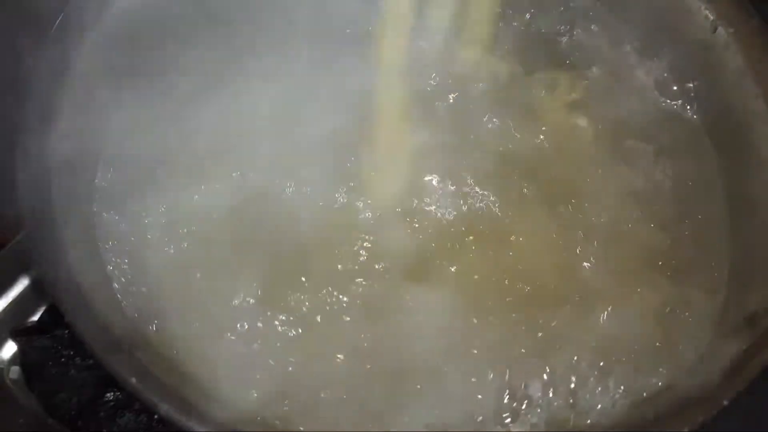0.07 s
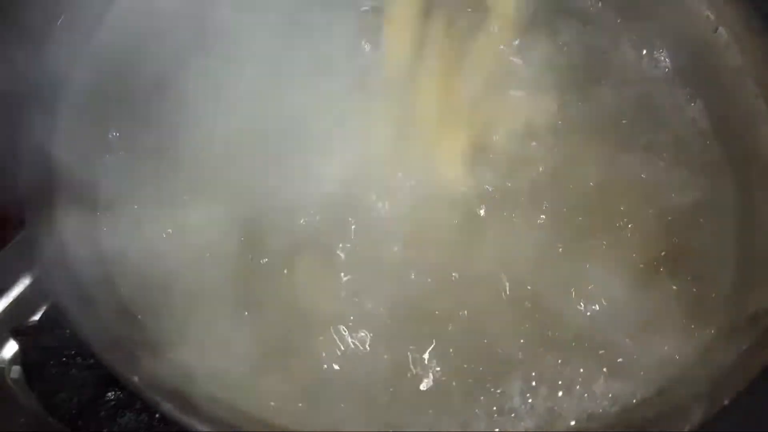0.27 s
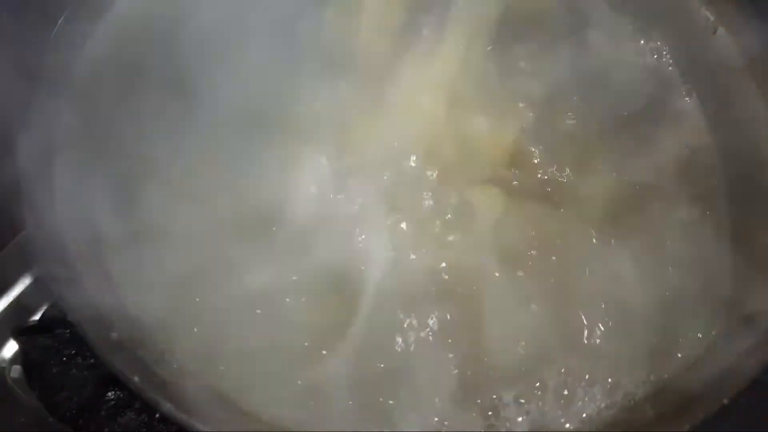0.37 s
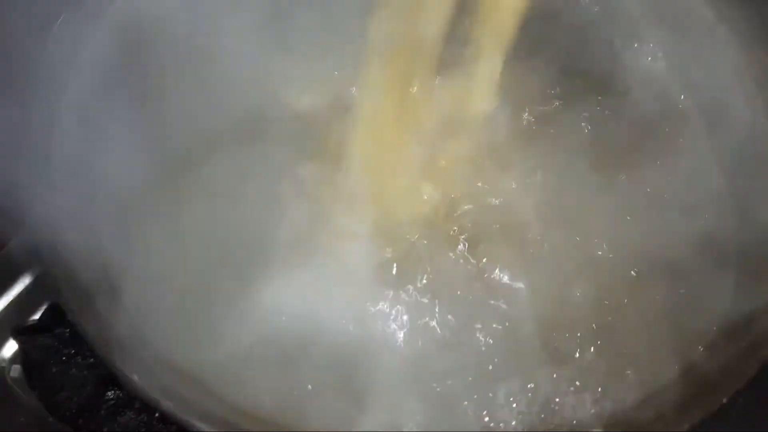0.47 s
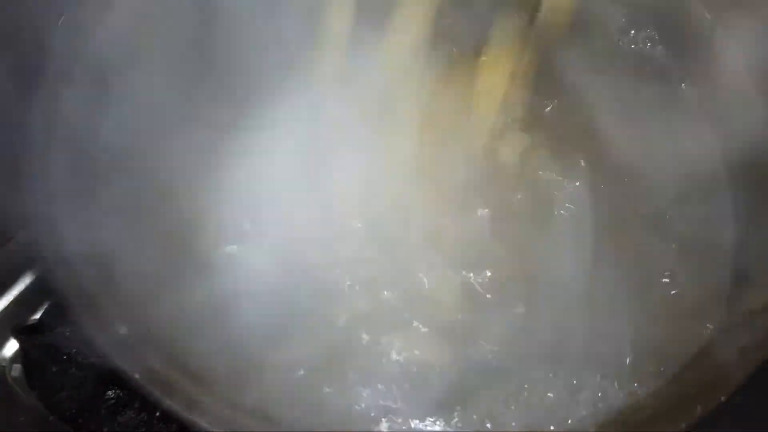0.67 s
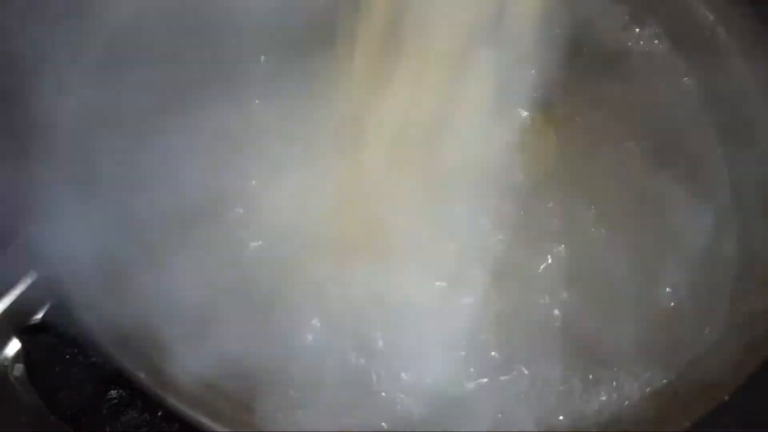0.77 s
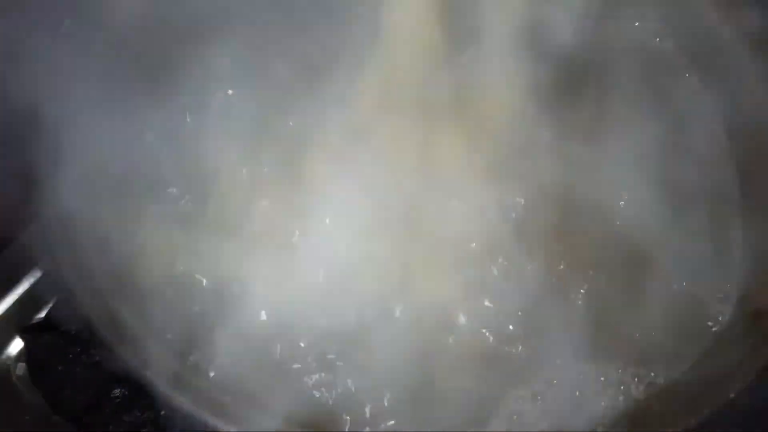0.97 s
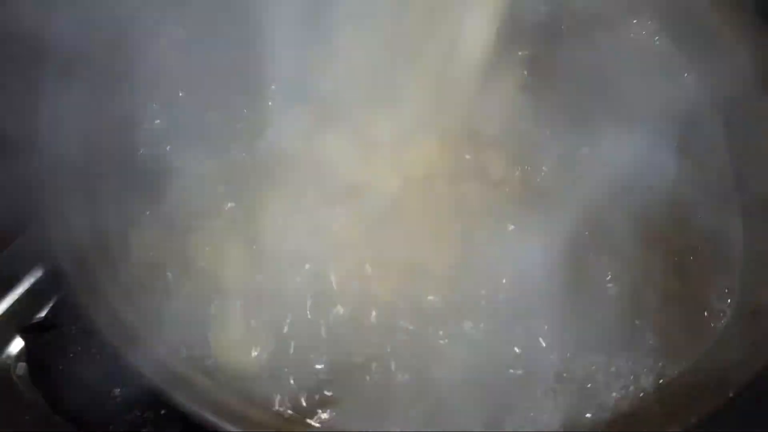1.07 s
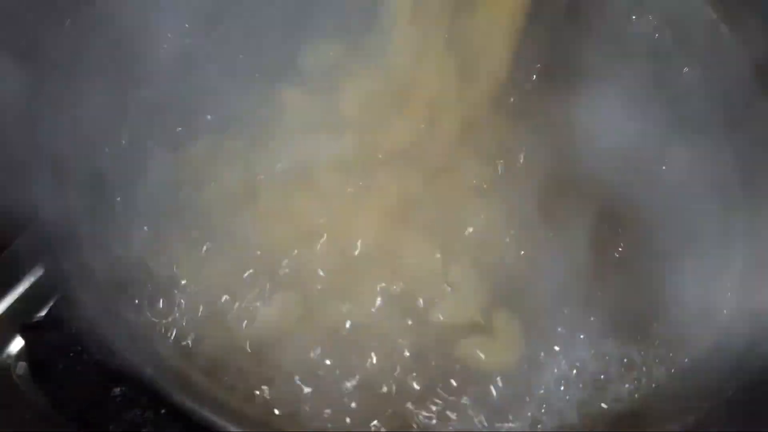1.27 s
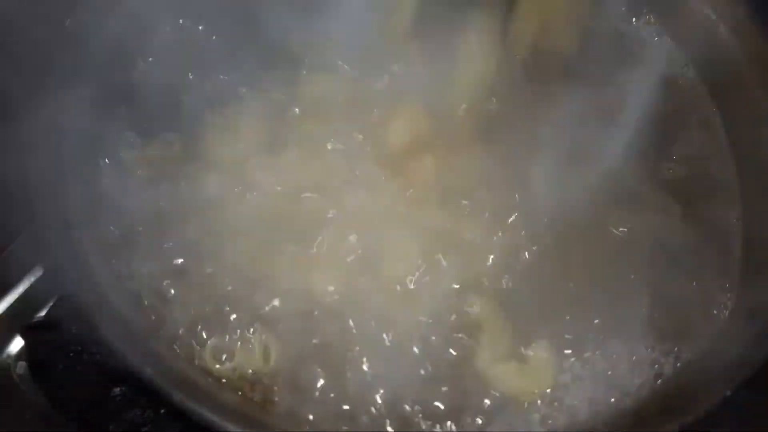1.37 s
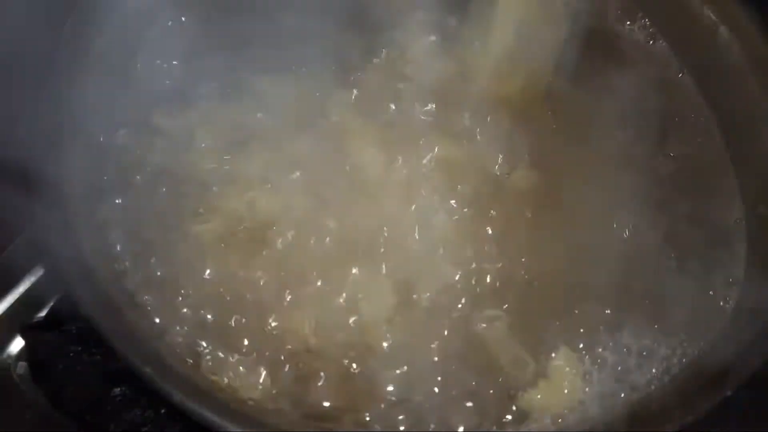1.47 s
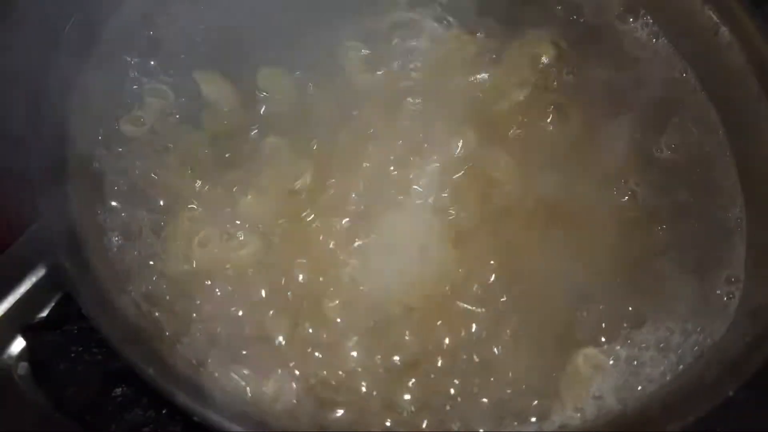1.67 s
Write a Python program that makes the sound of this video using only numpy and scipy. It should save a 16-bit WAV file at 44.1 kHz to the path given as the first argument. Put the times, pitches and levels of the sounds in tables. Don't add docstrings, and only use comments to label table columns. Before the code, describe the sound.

Dry pasta pours into boiling water, heard close in a small kitchen. Quiet simmer and faint ticks open; from 0.2 seconds hollow, bright clacks gather with small plops. The rattle thickens from 0.6, loudest around 0.8 to 1.3 in two merging rushes, with bubbling splashes, hissing spray and slight pan ring. It drops sharply after 1.4, leaving sparse faint clicks, one small crack near 1.6 and soft simmer.

```python
import sys
import numpy as np
from scipy import signal
from scipy.fft import rfft, irfft, next_fast_len
from scipy.io import wavfile
from scipy.ndimage import uniform_filter1d, map_coordinates

SR = 44100
rng = np.random.default_rng(int(sys.argv[2]) if len(sys.argv) > 2 else 0)


def boost(x):
    u = np.asarray(x, float) / 20
    return 10 ** u


def log_audio(samples):
    frames = np.atleast_2d(samples).T
    limited = np.clip(frames, -1, 1)
    pcm = np.round(limited * 32767).astype(np.int16)
    wavfile.write(sys.argv[1], SR, pcm)


N = 74970

# time_s, rattle_db, chips_over_rattle_db, spray_over_rattle_db
POUR = [(0, -61.5, 9, -11), (.19, -57.5, 3.5, -16), (.23, -52.5, 2.5, -17), (.3, -49.5, -4, -17),
        (.45, -47, 2, -31), (.48, -46.5, -8, -12), (.6, -37, 0, -14), (.655, -46, 2.5, -27),
        (.7, -36, -1, -13.5), (.78, -39, -10, -14.5), (1.01, -32, -19, -13), (1.05, -38, -16, -7.5),
        (1.2, -37, -20, -10.5), (1.237, -41.5, -16, -9), (1.33, -36.5, -6, -11), (1.44, -49, -3, -21),
        (1.53, -68.5, 11.5, -17), (1.7, -77, 15, -20)]
# time_s, level_db
SPLASHING = [(0, -67.5), (.09, -59), (.17, -65), (.26, -57.5), (.33, -47), (.425, -43.5), (.46, -44),
             (.58, -37), (.655, -40), (.69, -38.5), (.95, -39.5), (1.012, -33.5), (1.04, -38),
             (1.28, -36.5), (1.42, -50.5), (1.495, -54), (1.525, -65), (1.7, -65)]
# start_s, peak_db, pitch_hz
TUBE_KNOCKS = [(0.2043, -35, 3900), (0.2123, -28, 3730), (0.2151, -41, 3720), (0.2509, -38, 3920),
               (0.2632, -34, 3830), (0.2667, -37, 3550), (0.2976, -37, 3690), (0.3081, -41, 3570),
               (0.3248, -28, 3770), (0.3318, -33, 3420), (0.3377, -29, 3650), (0.3481, -30.5, 3970),
               (0.3782, -31, 3580), (0.3943, -37, 3640), (0.4169, -32, 3860), (0.4223, -28, 3840),
               (0.4264, -31, 3600), (0.4305, -37, 3680), (0.4705, -28.5, 3520), (0.4751, -32, 3640),
               (0.4888, -31, 3870), (0.4948, -23.5, 3580), (0.4993, -33, 3450), (0.5026, -27, 3700),
               (0.5105, -32, 3500), (0.5136, -28, 3420), (0.517, -30, 3440), (0.5589, -24.5, 3930),
               (0.5883, -29, 3510), (0.6081, -27, 3420), (0.6125, -23, 3740), (0.6308, -35, 3960),
               (0.6498, -28.5, 3680), (0.6675, -30, 3690), (0.671, -27, 3980), (0.6881, -23, 3670),
               (0.7052, -23, 3650), (0.7333, -29, 3640), (0.7404, -33, 3600), (0.7639, -25, 3560),
               (0.7762, -28, 3580), (0.7854, -23.5, 3600), (0.7977, -19.5, 3700), (0.8155, -21, 3460),
               (0.8408, -18, 3750), (0.8453, -23, 3890), (0.8778, -20, 3250), (0.8822, -31, 3460),
               (0.9078, -20.5, 3630),
               (0.9466, -24, 3600), (0.9667, -23, 4050), (0.976, -18, 3540), (0.9818, -21, 3580),
                 (1.0001, -21, 3420), (1.0075, -25, 3750), (1.0215, -20, 3800), (1.0686, -19, 3770),
                 (1.0775, -18, 3720), (1.1037, -24, 3740), (1.1102, -22.5, 3630), (1.1148, -21.5, 3240),
                 (1.131, -23, 3540), (1.1535, -23.5, 3400), (1.1629, -27, 3470), (1.181, -23.5, 3480),
                 (1.19, -20, 3360), (1.193, -24, 3050), (1.1953, -19.5, 3670), (1.21, -23, 3500),
                 (1.2171, -24.5, 3670), (1.2207, -22, 3400), (1.2481, -22, 3540), (1.2544, -20.5, 3400),
                 (1.2582, -20, 3400), (1.262, -19.5, 3710), (1.2664, -19, 3470), (1.292, -23.5, 3970),
                 (1.3069, -21.5, 3730), (1.3285, -20.5, 3430), (1.3313, -25, 3550), (1.339, -24, 4080),
                 (1.3655, -27, 3140), (1.392, -25, 3740), (1.3977, -26, 3710), (1.4036, -29, 3520),
                 (1.4084, -32, 3750), (1.411, -30, 3800), (1.4637, -38, 3690), (1.4691, -36.5, 3780),
                 (1.4802, -35.5, 3560), (1.4912, -38, 3370), (1.5402, -49, 3900), (1.5627, -45, 3710),
                 (1.577, -42.5, 3700), (1.5884, -44, 3410), (1.5923, -41, 3830), (1.6079, -37.5, 3730),
                 (1.6131, -41, 3900), (1.624, -33, 3720), (1.6772, -46, 3870)]
KNOCKS = TUBE_KNOCKS
# start_s, peak_db, pitch_hz
BRITTLE_TICKS = [(0.2369, -48, 7400), (0.393, -38, 7020), (0.4698, -37, 8200), (0.3784, -31, 2460),
                 (.5555, -29, 7400), (0.762, -41, 7700), (1.007, -21, 7340), (1.2477, -25, 7300),
                 (1.2929, -35, 8300), (1.329, -28, 8200), (1.338, -25, 7400), (1.3646, -28, 7500),
                 (1.42, -37, 8000), (1.4292, -32, 7930), (1.488, -46, 6700), (1.4527, -38, 3400),
                 (1.6938, -38, 3630)]
# start_s, level_db, dull_above_hz
CRACKS = [
    (.2635, -33, 4500),
    (.3782, -28, 3200),
    (.4705, -32, 10000),
    (1.6235, -33, 9000),
]
# pitch_hz, pitch_scatter_ln, level_db, life_cycles
TUBE_MODES = [
    (3700, .12, 0, 7.5),
    (5600, .06, -12, 8),
    (7500, .05, -18, 12),
    (4400, .07, -8, 7),
    (2400, .13, -14, 6),
]
# start_s, peak_db, pitch_hz
BIG_PLOPS = [(0.251, -43.5, 1296), (0.262, -45.5, 580), (0.312, -42, 1000), (0.337, -35.5, 1000),
             (0.378, -31, 1270), (0.422, -30, 1250), (0.486, -35.5, 965), (0.628, -28, 1110),
             (0.679, -25.5, 1104), (0.728, -29, 1100), (0.868, -30, 1290), (0.89, -25.5, 1270),
             (0.991, -26, 1530), (1.008, -19.5, 1270), (1.158, -37, 1140), (1.465, -50, 550),
             (1.488, -38, 1270), (1.546, -51, 1360), (1.623, -41, 1030)]
# pitch_hz, level_db_per_hz
SLOSH_COLOUR = [(250, -28.5), (430, -21), (520, -5), (800, -9), (1150, 2.5), (2000, -6), (2900, -6),
                (4500, -31)]
# pitch_hz, level_db_per_hz
SPRAY_COLOUR = [(2000, -26), (5000, 7), (9800, 4.5), (10400, -10), (15600, -1)]
# start_s, peak_db
JET_STARTS = [(0.4208, -59), (0.4702, -37.5), (0.5171, -48), (0.5415, -49), (0.5879, -41), (0.615, -35),
              (0.6782, -39), (0.7111, -42), (0.7835, -47), (0.8004, -36), (0.8812, -43), (0.9162, -37.5),
              (0.9655, -35), (0.9896, -32), (1.079, -32), (1.2454, -37.5), (1.2634, -42), (1.2928, -38),
              (1.3636, -46), (1.3976, -48)]
# pitch_hz, level_db_per_hz
JET_COLOUR = [(4000, -36), (7000, 3), (9800, 2.5), (10500, -5), (15600, -5)]
# time_s, level_db
FINE_SPRAY_GROWTH = [
    (.5, -9.5),
    (.95, 1),
]
# pitch_hz, width_hz, level_db
PAN_MODES = [(1030, 110, -36), (1160, 66, 6), (2423, 16, 2), (3400, 30, -37), (3790, 99, 3),
             (4680, 8.5, -34)]
# pitch_hz, t60_s
ROOM_DECAY = [(300, 0.48), (2000, 0.26), (5000, 0.17), (12000, 0.072)]
# pitch_hz, level_db_per_hz
SIMMER_COLOUR = [(50, -1.5), (300, -4.5), (600, 0), (1300, -3.5), (2400, -31), (4500, -7.5), (9500, -23.5),
                 (15600, -28)]
# centre_s, half_length_s, pitch_hz, level_db
HOB_DRONES = [
    (.75, .2, 86, -68),
    (.8, .2, 137, -74),
    (.8, .25, 60, -73),
    (1.62, .14, 70, -67),
    (.4, .15, 275, -74),
    (.3, .12, 140, -75),
]
# pitch_hz, level_db
MICROPHONE = [(20, -22), (50, 2), (15400, 2), (15550, -32)]

SWELL_CYCLES = 2.1
SURGE_DB = 1.5


def unit(x):
    return x / np.sqrt(np.mean(x ** 2) + 1e-20)


def along(points, hz):
    f, v = np.transpose(points)
    return np.interp(np.log(hz + 1), np.log(f + 1), v)


def curves(rows):
    s, *columns = np.transpose(rows)
    return [np.interp(np.arange(N) / SR, s, column) for column in columns]


def wobble(rate_hz):
    knots = rng.standard_normal(int(N * rate_hz / SR) + 4)
    return map_coordinates(knots, [np.arange(N) * rate_hz / SR])


def filtered(x, response):
    m = next_fast_len(N + SR // 2)
    return irfft(rfft(x, m) * response(np.fft.rfftfreq(m, 1 / SR)), m)[:N]


def hiss(colour):
    z = signal.stft(rng.standard_normal(N), nperseg=256)[2]
    patches = uniform_filter1d(rng.standard_normal(z.shape), size=4, axis=0)
    patches = uniform_filter1d(patches, size=5, axis=1)
    x = signal.istft(z * boost(1.8 * unit(patches)), nperseg=256)[1][:N]
    return unit(filtered(x, lambda hz: boost(along(colour, hz))))


def grains(s, hz, db, cycles, attack=.8, rise=0.):
    t = np.arange(600) / SR
    turns = hz[:, None] * t
    swell = 1 - np.exp(-(turns / attack) ** 2)
    decay = boost(db[:, None] + 7 - 20 * turns / cycles)
    glide = 1 + rise * np.minimum(turns / cycles, 1) / 2
    wave = swell * decay * np.sin(2 * np.pi * turns * glide)
    at = np.clip(np.round(s * SR).astype(int), 0, N)[:, None] + np.arange(len(t))
    return np.bincount(at.ravel(), wave.ravel(), N + 1000)[:N]


def stream(per_s, spread_db):
    u = rng.random((int(per_s * N / SR), 2))
    return u[:, 0] * N / SR, -spread_db * np.log(u[:, 1] + .02)


def clusters():
    width_s = .011
    starts = np.round(np.transpose(KNOCKS)[0] * SR).astype(int)
    crowd = np.bincount(starts, minlength=N)[:N]
    crowd = np.sqrt(abs(filtered(crowd, lambda hz: np.exp(-(np.pi * hz * width_s) ** 2))))
    return unit(crowd - crowd.mean())


def tubes(s, db, pitch):
    out = 0
    for k, (hz, scatter, mode_db, cycles) in enumerate(TUBE_MODES):
        r = rng.standard_normal((len(s), 3)).clip(-2, 1.5)
        f = pitch if k == 0 and pitch is not None else hz * np.exp(scatter * r[:, 0])
        chance = k > 0
        lag_s = chance * .0012 * abs(r[:, 2])
        level_db = db + mode_db + 2.6 * r[:, 1] * chance
        out = out + grains(s + lag_s, f, level_db, cycles, attack=SWELL_CYCLES)
    return out


def rattle():
    flow_db, chip_db, _ = curves(POUR)
    clump = boost(2.5 * clusters())
    s, db = stream(1500, 2)
    knocks = boost(-1) * unit(tubes(s, db, None) * clump)
    s, db = stream(900, 3.0)
    hz = 6300 * np.exp(.17 * rng.standard_normal(len(s)).clip(-2, 2))
    chips = unit(grains(s, hz, db, 11, attack=SWELL_CYCLES) * clump)
    return boost(flow_db) * (knocks + boost(chip_db - 7) * chips)


def single_knocks():
    s, db, hz = np.transpose(KNOCKS)
    return tubes(s, db + 1, hz)


def brittle_ticks():
    s, db, hz = np.transpose(BRITTLE_TICKS)
    return grains(s, hz, db, 10.3, attack=2.4)


def cracks():
    out, t = np.zeros(N), np.arange(300) / SR
    for s, db, dull_hz in CRACKS:
        burst = boost(db - 60 * t / .007) * rng.standard_normal(len(t))
        band = signal.butter(3, [500, dull_hz], "band", fs=SR)
        out[round(s * SR):][:len(t)] += signal.lfilter(*band, burst)
    return out


def big_plops():
    s, db, hz = np.transpose(BIG_PLOPS)
    return grains(s, hz, db - 3, 6.2, attack=1.05, rise=.06)


def water():
    splash_db, = curves(SPLASHING)
    s, db = stream(600, 2)
    hz = 1230 * np.exp(.24 * rng.standard_normal(len(s)).clip(-2, 3))
    plops = unit(grains(s, hz, db, 5, attack=.67, rise=.12))
    slosh = boost(-3 + SURGE_DB * wobble(29.78)) * hiss(SLOSH_COLOUR)
    return boost(splash_db) * (boost(-6.5) * plops + slosh)


def pan_hum():
    splash_db, = curves(SPLASHING)
    centre_hz, width_hz = 547.3, 72

    def column(f):
        return (1j * f * width_hz / (centre_hz ** 2 - f * f + 1j * f * width_hz)) ** 2

    note = unit(filtered(rng.standard_normal(N), column))
    late_db = np.interp(np.arange(N) / SR, [1.1, 1.4], [-12, 0])
    return boost(splash_db + late_db - 13) * note


def spray():
    flow_db, _, spray_db = curves(POUR)
    s, db = stream(1500, 2.6)
    hz = 11000 * np.exp(.25 * rng.standard_normal(len(s))).clip(.4, 1.5)
    drops = unit(grains(s, hz, db, 20.0, attack=3.3))
    surge = boost(SURGE_DB * wobble(39.3)) * boost(SURGE_DB * clusters())
    return boost(flow_db + spray_db + 1.5) * (.45 * drops + surge * hiss(SPRAY_COLOUR))


def jets():
    t, loss_db_per_s = np.arange(N) / SR, 344
    power = 0
    for s, db in JET_STARTS:
        power = power + (t >= s) * boost(2 * (db - 8 - loss_db_per_s * abs(t - s)))
    return np.sqrt(power) * hiss(JET_COLOUR)


def mist():
    x = spray() + jets()
    growth = boost(curves(FINE_SPRAY_GROWTH)[0]) - 1
    return x + growth * filtered(x, lambda hz: hz > 10400)


def pan(x):
    def response(f):
        out = 0
        for k, (centre, width, db) in enumerate(PAN_MODES):
            out = out + (-1) ** k * boost(db) * 1j * f * width / (centre ** 2 - f * f + 1j * f * width)
        return out

    return filtered(x, response)


def room(x):
    hz, t, z = signal.stft(rng.standard_normal(SR // 3), SR, nperseg=256)
    decay = boost(-60 * t / along(ROOM_DECAY, hz)[:, None])
    tail = signal.istft(z * decay, SR, nperseg=256)[1]
    return signal.fftconvolve(np.pad(x, (120, 0)), tail / np.linalg.norm(tail))[:N]


def hob():
    t, out = np.arange(N) / SR, 0
    for s, half_s, hz, db in HOB_DRONES:
        swell = boost(db) * np.exp(-((t - s) / half_s) ** 2)
        out = out + swell * np.sin(2 * np.pi * hz * t + .84 * wobble(17.0))
    return np.sqrt(2) * out


def simmer():
    return boost(-65) * hiss(SIMMER_COLOUR)


def scene():
    pasta = rattle() + single_knocks() + brittle_ticks() + cracks()
    near = boost(-2) * (pasta + big_plops() + water() + pan_hum() + mist())
    near = near + boost(-13) * pan(near)
    return (near + boost(-8) * room(near) + simmer() + hob())[None]


def roll_off(x):
    return signal.sosfilt(signal.butter(12, 15710, fs=SR, output="sos"), x)


def record(dry):
    mix = filtered(dry[0], lambda hz: boost(along(MICROPHONE, hz)))[None]
    return roll_off(mix)


dry = scene()
out = record(dry)
log_audio(out)
```